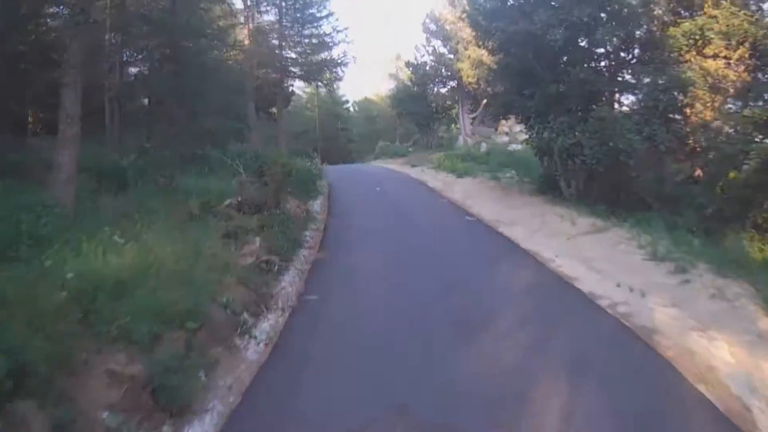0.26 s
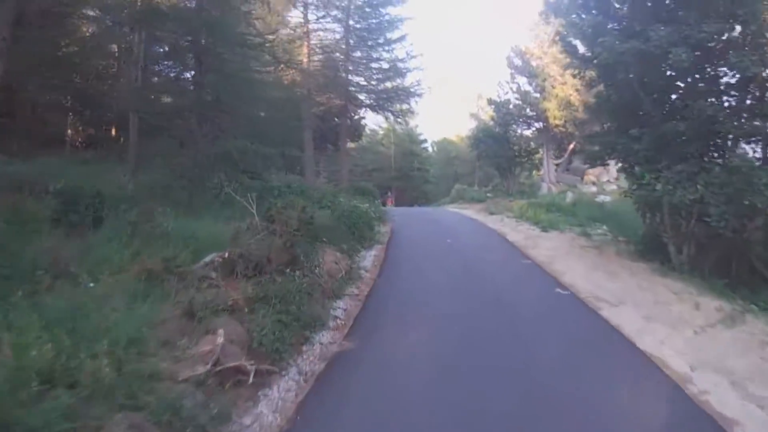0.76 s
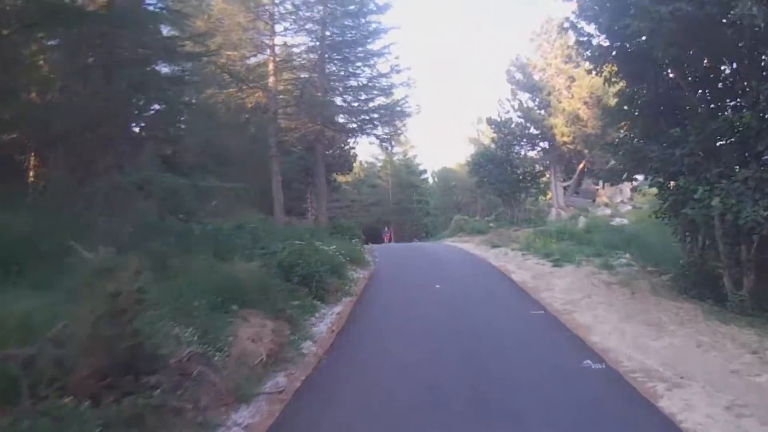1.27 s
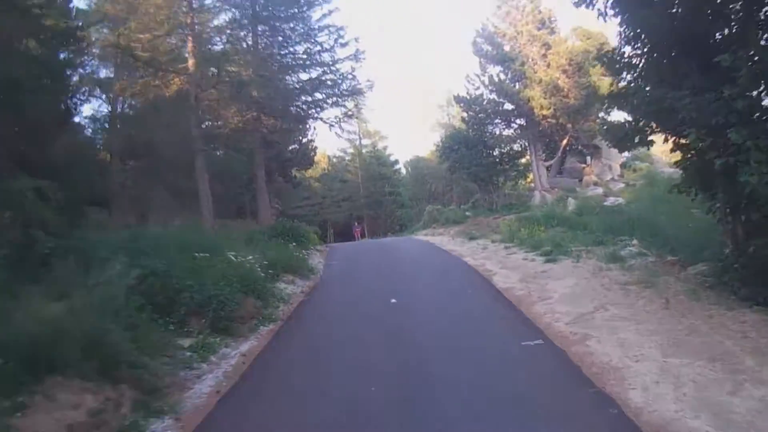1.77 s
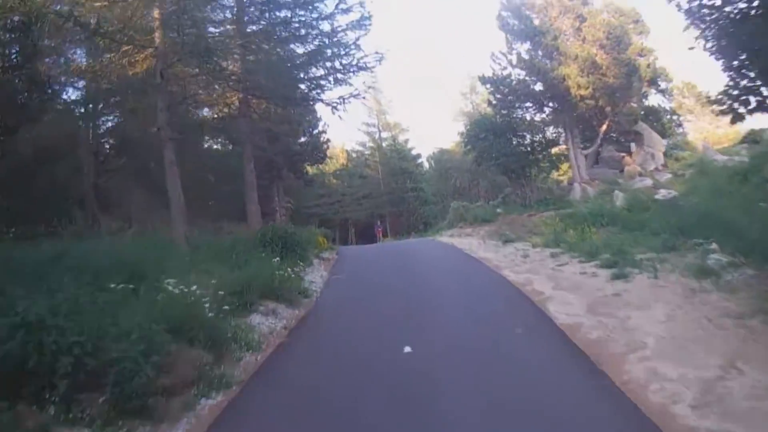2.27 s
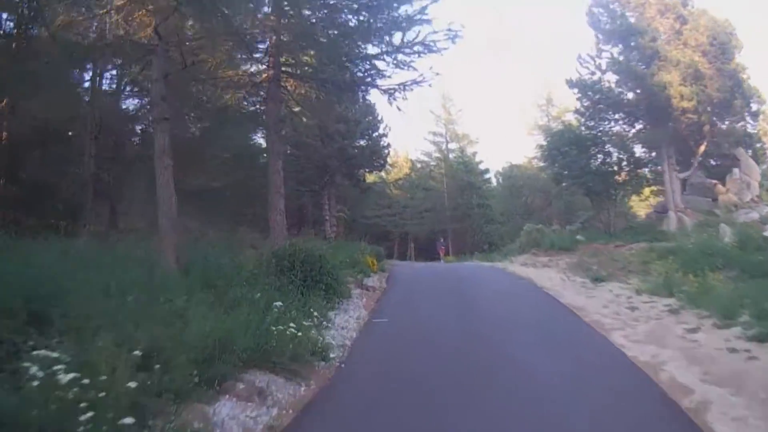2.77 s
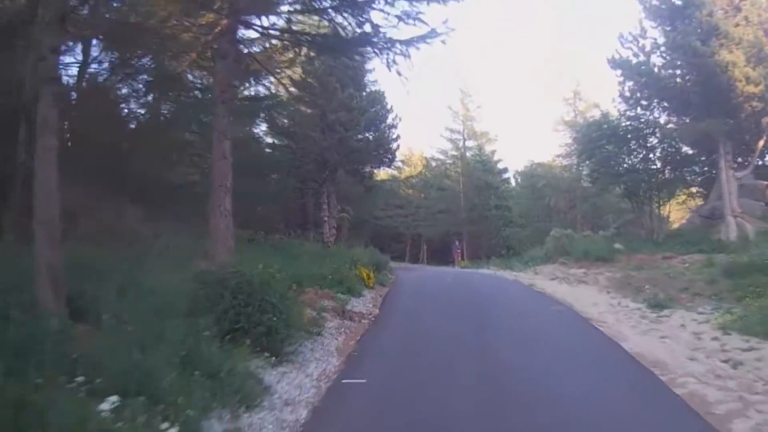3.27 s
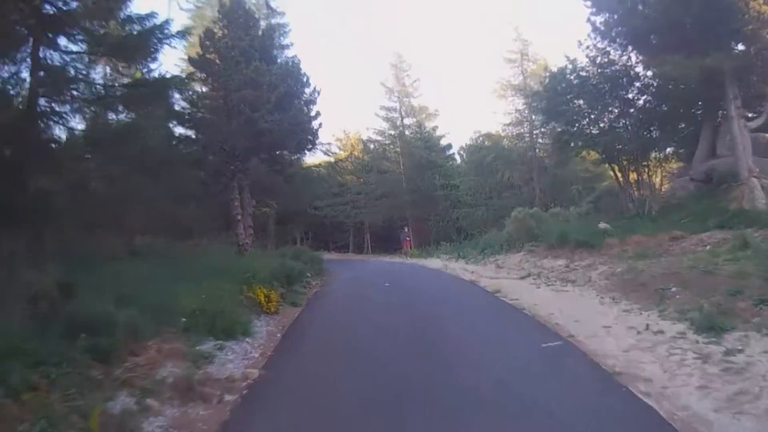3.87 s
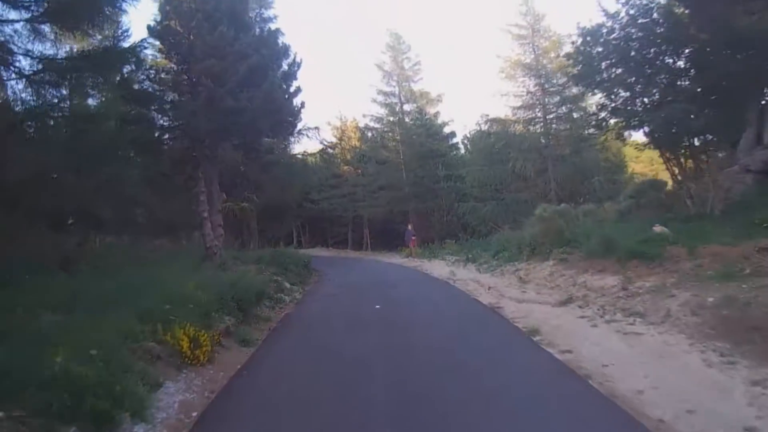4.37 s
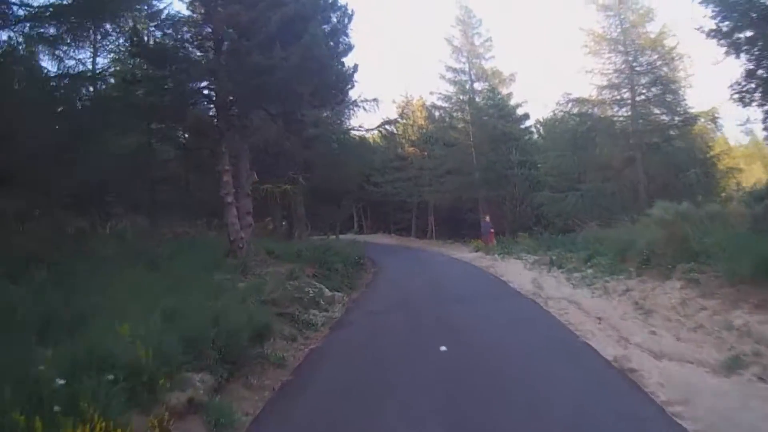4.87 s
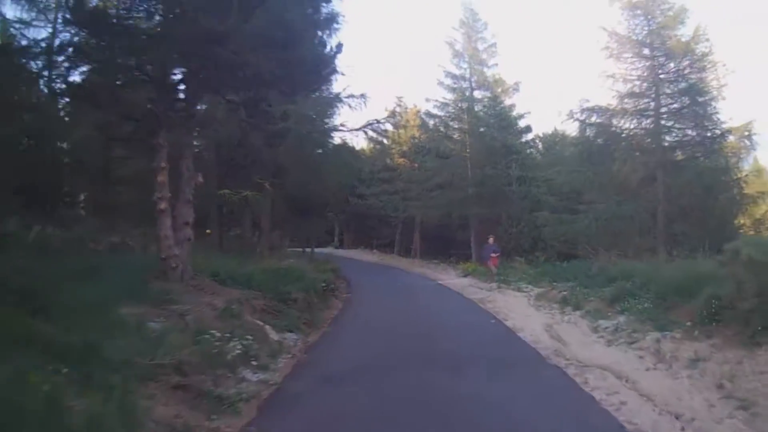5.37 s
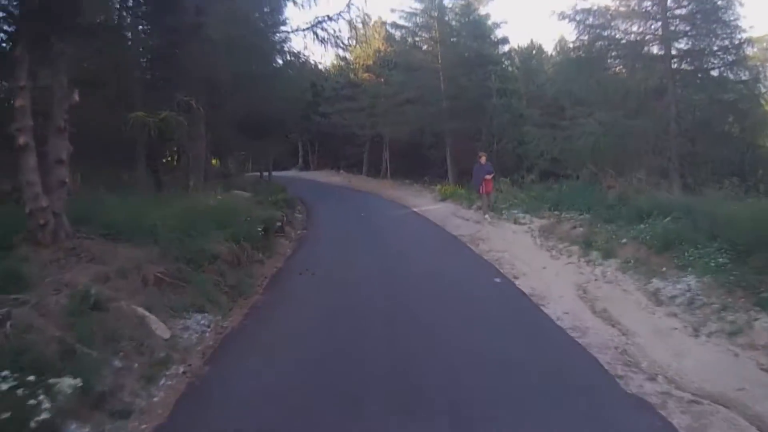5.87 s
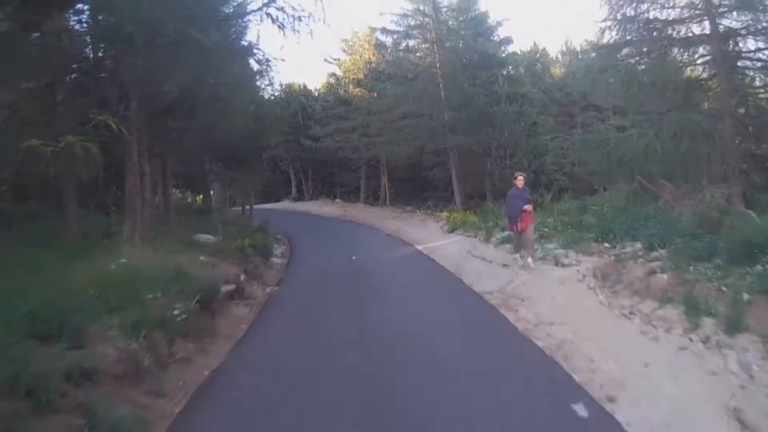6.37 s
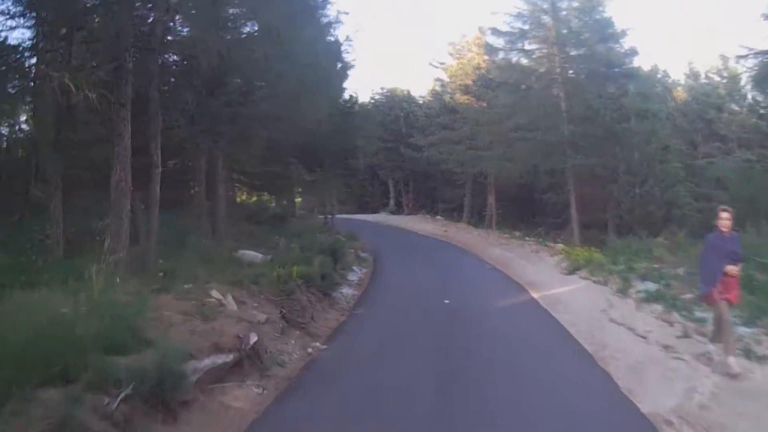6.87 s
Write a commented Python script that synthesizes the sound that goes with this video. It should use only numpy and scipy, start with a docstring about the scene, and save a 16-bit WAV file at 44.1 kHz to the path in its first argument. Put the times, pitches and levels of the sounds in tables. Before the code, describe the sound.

Skateboard wheels rumble steadily along a paved downhill path, mixed with low wind buffeting the rider's microphone. A fine patter and irregular ticks of small stones run through the roll. As the board gathers speed, the rumble grows louder in waves and rises slightly in pitch. Brief sandy crackles come and go, and the last stretch is the loudest and grittiest.

```python
"""A low rumble of wheels on asphalt, dotted with dull ticks of grit: a longboard gathers speed down a path.
The road's stones make the deck boom and the wheels roar, and patter through the case of the rider's camera.
Rough patches shake the deck, the wheels scrub in the bends, loose sand crackles and air buffets the case.
One curve, the rolling effort (speed and coarseness of the road), makes these swell and ease together.
Under it all lies the camera's own faint hiss and whine."""
import sys
import numpy as np
from scipy import signal
from scipy.fft import rfft, irfft, next_fast_len
from scipy.io import wavfile
from scipy.ndimage import map_coordinates

SR = 44100
rng = np.random.default_rng(int(sys.argv[2]) if len(sys.argv) > 2 else 0)


def to_wav(sig):
    """Store sig (one row per channel, or 1-D mono) as 16-bit WAV at the path in sys.argv[1].

    Samples outside -1..1 are clipped; the rate is SR.
    """
    pcm = np.clip(np.atleast_2d(sig), -1, 1) * 32767
    pcm = np.round(pcm).astype(np.int16)
    wavfile.write(sys.argv[1], SR, pcm.T)  # frames by channels


N = 313992

# Each _DB is a layer's base level; its _GROWS is the dB it gains for each dB of rolling effort.
ROAR_DB, ROAR_GROWS = -40.5, 0.62
DECK_DB, DECK_GROWS = -41.5, 0.88
GRAIN_DB, GRAIN_GROWS = -63.5, 1.16  # the road's grain: shared by patter and sand
CHIP_DB, CHIP_GROWS = -57.5, 0.73
SPRAY_DB, SPRAY_GROWS = -93, 2.2
WIND_DB, WIND_GROWS = -48.5, 0.91


# Uneven patches of road that shake the deck: middle_s, length_s, extra_boom_db
ROUGH_PATCHES = [(0.61, 0.19, 4.5), (1.05, 0.11, 4.5), (1.76, 0.23, 2.5), (2.98, 1.4, 2.5),
                 (4.6, 0.88, 2.5), (6.85, 0.12, 9)]
# Bends where the rider leans and the wheels scrub: middle_s, length_s, extra_roar_db
BENDS = [(0.3, 0.91, 2), (5.9, 0.69, 3.5), (6.6, 1.5, 2)]
def rolling(effort_db, grain_db):
    """The same small stones shake the deck, the wheels and the case."""
    stones = contacts(per_s=1500, spread_db=5.5)
    load_db = wobble(45)  # the wheels press harder and softer as the board jiggles
    boom = amp(DECK_DB + DECK_GROWS * effort_db + swells(ROUGH_PATCHES)) * deck_boom(stones)
    roar = amp(ROAR_DB + ROAR_GROWS * effort_db + swells(BENDS)) * wheel_roar(stones)
    patter = amp(grain_db + 0.64 + 1.6 * load_db) * case_patter(stones)
    return amp(0.75 * load_db) * (boom + roar) + patter


# How strongly the wheels sound at each pitch: pitch_hz, level_db
WHEEL_TONE = [(60, -36), (175, -16), (245, 1), (340, 0), (450, -1.5), (540, -5.5), (680, -16), (820, -28),
              (1100, -40), (3000, -80)]
def wheel_roar(stones):
    """Stones strike the wheels so often that the knocks blur into a roar."""
    return shaken(stones, WHEEL_TONE)


# The deck's deep tone, before speed shifts its pitch: pitch_hz, level_db
DECK_TONE = [(60, -22.5), (100, -8.5), (140, -3), (185, -0.5), (235, -0.2), (320, -11.5), (600, -39.5),
             (2000, -83.5)]
def deck_boom(stones, slow_pitch=0.899, fast_pitch=1.209):
    """The deck's boom wavers and climbs in pitch, fading from its slow tone into its fast one."""
    fast_share = np.clip(np.linspace(0, 1, N) ** 2 + 0.22 * wobble(9), 0, 1)
    slow = shaken(stones, [(hz * slow_pitch, db) for hz, db in DECK_TONE])
    fast = shaken(stones, [(hz * fast_pitch, db) for hz, db in DECK_TONE])
    return unit(np.sqrt(1 - fast_share) * slow + np.sqrt(fast_share) * fast)


# The hollow tone of the camera's case: pitch_hz, level_db
CASE_TONE = [(200, -19), (600, -2), (900, -3.5), (1150, 2), (1500, -0.5), (1900, 2.5), (2150, -6.5),
             (2500, -20), (3200, -29), (3800, -24), (4400, -32.5), (6000, -36), (9000, -44.5), (16000, -75)]
def case_patter(stones):
    """The road's grain comes through the case as a fine patter."""
    return shaken(stones, CASE_TONE, noise_db=-4)


# The bright tone of a hard click: pitch_hz, level_db
CLICK_TONE = [(500, -23.5), (1400, -0.5), (2200, 6.5), (2800, 3.5), (3300, -4.5), (3850, -2.5),
              (4600, -13.5), (6500, -21.5), (9000, -41), (14000, -58)]
# Larger bits of grit under the wheels: start_s, level_db, click_db, pitch_hz, ring_s
# (the higher click_db, the harder the hit sounds)
GRIT_HITS = [(0.0685, -51, -29, 1750, .006), (0.1359, -43.5, -23, 1650, 0.0052),
             (0.1755, -46.5, -38, 1800, 0.0089), (0.2099, -53, -36, 1850, .006),
             (0.2388, -51, -31, 1800, .005), (0.3234, -44, -35, 1400, .007), (0.4724, -54, -38, 1890, .008),
             (0.5633, -46.5, -37, 1770, .008), (0.6635, -43.5, -38, 1500, .007),
             (0.8012, -57, -38, 1850, .006), (1.033, -48.5, -38, 1800, 0.013),
             (1.0473, -52, -36, 1700, .005), (1.5167, -44.5, -38, 1850, .007),
             (1.8155, -46, -21, 1810, 0.0071), (2.1291, -47.5, -38, 1500, .005),
             (2.2965, -35, -28, 1800, 0.0054), (2.4542, -47, -34, 1750, .005),
             (2.516, -46, -32, 1800, .005), (2.5393, -44, -27, 1450, .005), (2.7575, -44, -30, 1750, .006),
             (2.804, -37, -32, 1400, .005), (2.989, -46, -35, 1750, .006), (3.0209, -50, -34, 1810, .006),
             (3.2109, -52, -21, 1900, 0.0066), (3.2537, -47, -39, 1800, .007),
             (3.4217, -45, -32, 1700, .005), (3.451, -50, -27, 1950, 0.0084),
             (3.6005, -42.5, -30, 1880, 0.014), (3.6595, -39.5, -36, 1800, .006),
             (4.1423, -44, -34, 1700, 0.0045), (4.186, -42, -28, 1860, 0.0053),
             (4.321, -45, -38, 1750, 0.0067), (4.4299, -42, -36, 1700, .005),
             (4.4819, -48, -17, 1890, .008), (4.568, -45.5, -25, 1750, 0.006),
             (4.6003, -46, -36, 1550, 0.0055), (4.609, -46, -37, 1800, .005),
             (4.851, -35.5, -33, 1500, .006), (4.9006, -45, -36, 1650, .006),
             (4.9783, -41, -36, 1700, .006), (5.4899, -44, -36, 1750, .006),
             (5.5705, -42, -34, 1700, 0.0065), (5.594, -49, -34, 1800, 0.0045),
             (6.0278, -44.5, -30, 1830, 0.0097), (6.064, -49, -17, 1910, .008),
             (6.093, -43, -25, 1450, .006), (6.5908, -49, -20, 1750, .006), (6.745, -43, -22.5, 1780, .01),
             (6.7612, -48, -32, 1800, 0.0081), (6.8298, -43.5, -24, 1900, .014),
             (6.8454, -46, -31, 1700, .008), (6.8865, -43, -22.5, 1400, .007),
             (6.9003, -43, -29, 1750, 0.0052), (6.9624, -49, -27, 1800, 0.006)]
def grit(echo_s=0.00103, echo_share=0.35):
    """Each larger bit gives a dry knock, a brief ring, a hard click and a small thud."""
    start_s, level_db, click_db, pitch_hz, ring_s = np.transpose(GRIT_HITS)
    at = np.round((start_s + 0.00035) * SR).astype(int)  # the blow peaks just after first touch
    blows = np.bincount(at, amp(level_db), N)
    rings = ticks(start_s, level_db - 0.7, pitch_hz, ring_s, rise_s=0.00061)
    knocks = muffled(amp(-1.0) * struck(blows, CASE_TONE) + rings)
    clicks = struck(np.bincount(at, amp(level_db + click_db), N), CLICK_TONE)
    # a hard click bounces once inside the case
    clicks = filtered(clicks, lambda hz: 1 + echo_share * np.exp(-2j * np.pi * hz * echo_s))
    thuds = struck(blows, WHEEL_TONE)
    return knocks + amp(13.5) * clicks + amp(-6.5) * thuds


def chips(effort_db, per_s=60, range_db=9):
    """Small bits of grit tick at random, louder as the board rolls harder."""
    when, softness, pitch, ring = rng.random((int(per_s * N / SR), 4)).T
    level_db = CHIP_DB + CHIP_GROWS * effort_db[(when * N).astype(int)] - range_db * softness
    pitch_hz = 1950 - 700 * pitch ** 2
    ring_s = 0.0027 + 0.0064 * ring
    return muffled(ticks(when * N / SR, level_db, pitch_hz, ring_s, rise_s=0.00068))


# Stretches strewn with loose sand: middle_s, length_s, extra_crackle_db
SANDY_STRETCHES = [(2.5, 1, 4.5), (2.8, 0.2, 4), (4.64, 0.27, 4), (4.92, 0.3, 4), (6.03, 0.35, 2),
                   (6.8, 0.46, 4.5)]
def sand(grain_db, grains=1100, clumps_per_s=50, clump_db=2):
    """Clumps of loose grains crackle under the wheels, each grain at its own pitch; a few snap."""
    sand_db = grain_db + swells(SANDY_STRETCHES) + clump_db * wobble(clumps_per_s)
    when, softness, pitch, ring = rng.random((grains, 4)).T
    pitch_hz = 2050 - 1000 * pitch ** 2
    ring_s = 0.0016 + 0.004 * ring
    crackle = unit(muffled(ticks(when * N / SR, -13 * softness, pitch_hz, ring_s, rise_s=0.0005)))
    snaps = unit(struck(contacts(per_s=46, spread_db=0.5), CLICK_TONE))
    harder_db = 0.35 * (sand_db - sand_db.mean())  # faster rolling cracks them harder
    return amp(sand_db) * (amp(-6.0) * crackle + amp(harder_db - 29.5) * snaps)


def sand_spray(effort_db):
    """At speed the wheels crack fine sand into short, bright bursts."""
    cracks = contacts(per_s=360, spread_db=2.5) * amp(3 * wobble(35))
    return amp(SPRAY_DB + SPRAY_GROWS * effort_db) * unit(struck(cracks, CLICK_TONE))


# The low rumble of air on the case: pitch_hz, level_db
WIND_TONE = [(15, -7), (30, -5), (60, -3.5), (100, -2), (140, -3.5), (250, -11.5), (600, -34.5),
             (2000, -79.5)]
# Gusts on the case: middle_s, length_s, extra_wind_db
GUSTS = [(2.75, 0.54, 1), (4.65, 0.67, 3), (6.72, 0.51, 4)]
def wind(effort_db):
    """Swirls of air push on the case, harder with speed and in gusts."""
    level_db = WIND_DB + WIND_GROWS * effort_db + swells(GUSTS) + 0.31 * wobble(12)
    return amp(level_db) * noise(WIND_TONE)


# The tone of the camera's hiss: pitch_hz, level_db
HISS_TONE = [(100, -0.5), (3000, 0.5), (5200, -1.5), (8000, -3.5), (10300, -2.5), (11000, -4.5),
             (12200, -3), (12800, -24.5), (16000, -19.5)]
# Thin whistles from its electronics: pitch_hz, half_width_hz, level_db
WHISTLES = [(4530, 55, -102), (6930, 110, -101), (9100, 50, -103), (11460, 240, -96.5), (11470, 49, -95)]
def electronics():
    """The camera's circuits add a faint, steady hiss and a few fuzzy whistles."""
    sound = amp(-86.0) * noise(HISS_TONE)
    for pitch_hz, half_width_hz, level_db in WHISTLES:
        white = rng.standard_normal(N)
        whistle = filtered(white, lambda hz: 1 / (1 + ((hz - pitch_hz) / half_width_hz) ** 2))
        sound += amp(level_db) * unit(whistle)
    return sound


def contacts(per_s, spread_db):
    """Random blows from the road: many small, a few large."""
    hit = rng.random(N) < per_s / SR
    strength = amp(spread_db * np.clip(rng.standard_normal(N), -2, 2))
    return hit * strength * np.sign(rng.standard_normal(N))


def struck(blows, tone, size=2048):
    """Each blow makes a body ring briefly with the given tone."""
    cepstrum = irfft(np.log(gain_at(tone, np.fft.rfftfreq(size, 1 / SR))))
    # fold the second half onto the first, so the ring never comes before the blow
    cepstrum[1:size // 2] *= 2
    cepstrum[size // 2 + 1:] = 0
    ring = irfft(np.exp(rfft(cepstrum)))
    return signal.fftconvolve(blows, ring / np.abs(ring).max())[:N]


def shaken(blows, tone, noise_db=0):
    """A shaken body gives knocks plus a smooth rush of the same tone."""
    return unit(unit(struck(blows, tone)) + amp(noise_db) * noise(tone))


def ticks(start_s, level_db, pitch_hz, ring_s, rise_s, size=600):
    """Tiny rings that swell for about rise_s and fade by 60 dB in ring_s."""
    t = np.arange(size) / SR
    shape = (1 - np.exp(-(t / rise_s) ** 2)) * amp(-60 * t / ring_s[:, None])
    shape /= shape.max(axis=1, keepdims=True)
    waves = amp(level_db)[:, None] * shape * np.sin(2 * np.pi * pitch_hz[:, None] * t)
    at = np.round(start_s * SR).astype(int)[:, None] + np.arange(size)
    return np.bincount(at.ravel(), waves.ravel(), N)[:N]


def muffled(x, cutoff_hz=2200):
    """The case steeply cuts the treble."""
    return signal.sosfilt(signal.butter(6, cutoff_hz, fs=SR, output="sos"), x)


def noise(tone):
    """A steady rush with the given tone."""
    return unit(filtered(rng.standard_normal(N), lambda hz: gain_at(tone, hz)))


def filtered(x, response):
    """Turn each pitch in x up or down by response(hz)."""
    size = next_fast_len(N + SR // 2)
    return irfft(rfft(x, size) * response(np.fft.rfftfreq(size, 1 / SR)), size)[:N]


def gain_at(tone, hz):
    """Read a tone table's gain at any pitch."""
    pitch_hz, level_db = np.transpose(tone)
    return amp(np.interp(np.log(hz + 1), np.log(pitch_hz + 1), level_db))


def swells(rows):
    """Smooth humps of extra level, in dB."""
    t = np.arange(N) / SR
    return sum(extra_db * np.cos(np.pi * np.clip((t - middle_s) / length_s, -.5, .5)) ** 2
               for middle_s, length_s, extra_db in rows)


def wobble(per_s):
    """A smooth curve through per_s random points a second."""
    points = rng.standard_normal(int(N * per_s / SR) + 4)
    return map_coordinates(points, [np.arange(N) * per_s / SR])


def amp(db):
    """Turn decibels into a gain."""
    return 10 ** (np.asarray(db) / 20)


def unit(x):
    """Scale to an average strength (rms) of 1."""
    return x / np.sqrt(np.mean(x ** 2) + 1e-20)


# How hard the board rolls: time_s, effort_db
ROLLING_EFFORT = [(0.0, -4), (0.14, -3), (0.9, -4.5), (1.04, -3.5), (1.16, -4), (1.86, -0.2), (2.0, -3),
                  (2.1, -0.3), (2.88, 0.5), (3.14, -1.7), (3.64, 1.4), (3.86, -1.5), (4.84, 3), (5.28, -1),
                  (5.62, 2.0), (5.98, 1), (6.08, 4.5), (6.38, -0.5), (6.66, 4.5), (7.1, 5)]
def scene():
    """Board, wind and hiss meet at one microphone."""
    effort_db = np.interp(np.arange(N) / SR, *np.transpose(ROLLING_EFFORT))
    grain_db = GRAIN_DB + GRAIN_GROWS * effort_db
    board = rolling(effort_db, grain_db) + sand(grain_db) + sand_spray(effort_db)
    board += chips(effort_db) + grit()
    return (board + wind(effort_db) + electronics())[None]


def record(dry, top_hz=15800):
    """The camera keeps nothing above top_hz."""
    return filtered(dry[0], lambda hz: hz < top_hz)[None]


dry = scene()
out = record(dry)
to_wav(out)
```